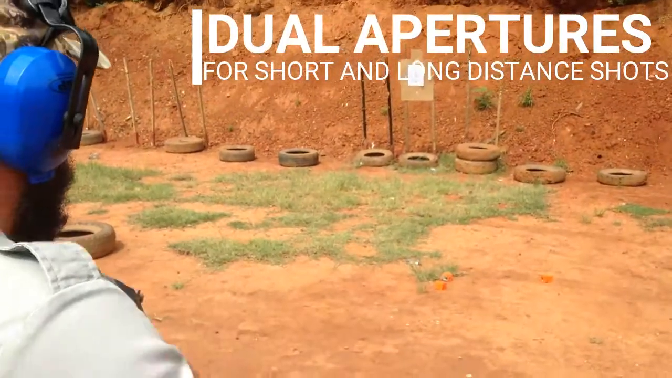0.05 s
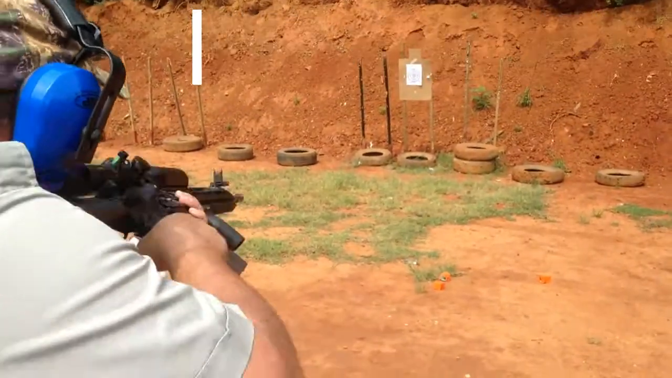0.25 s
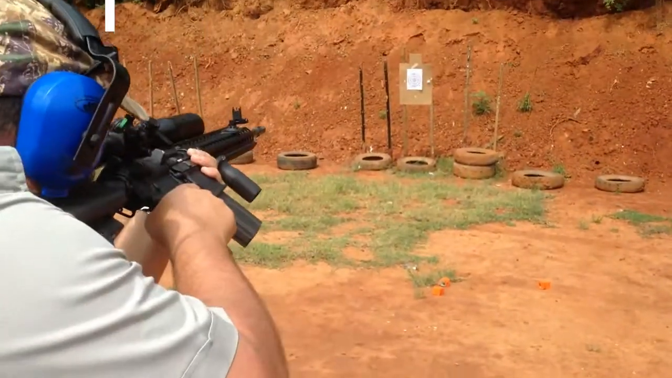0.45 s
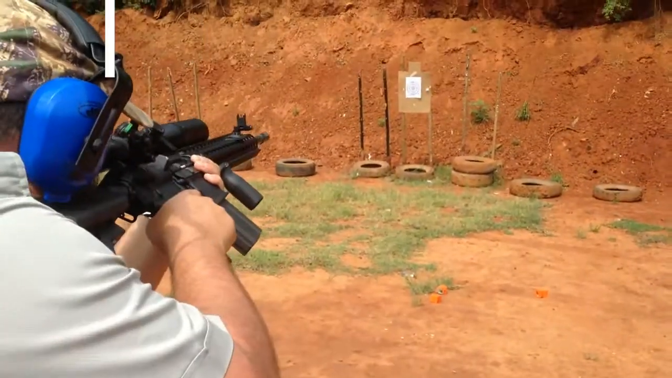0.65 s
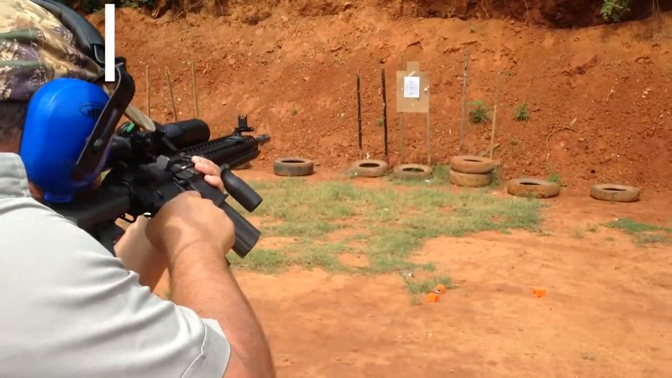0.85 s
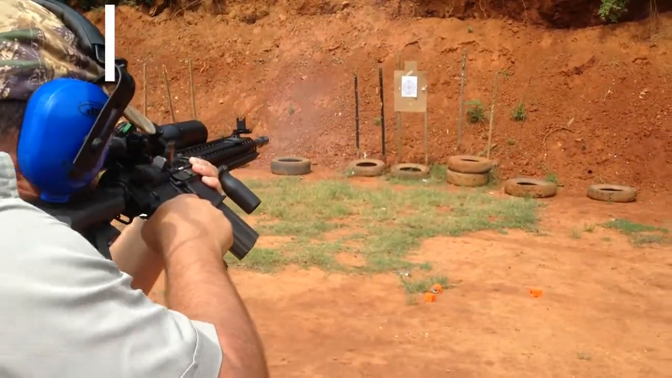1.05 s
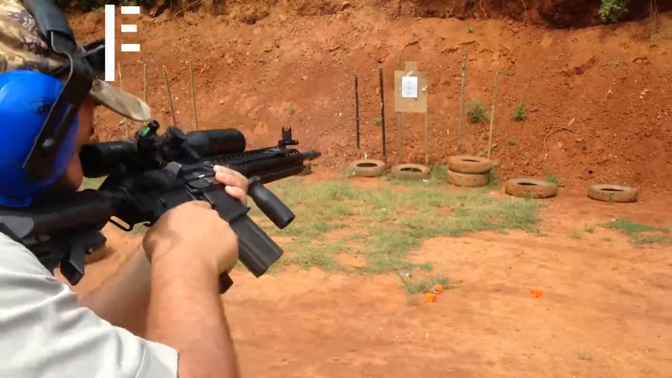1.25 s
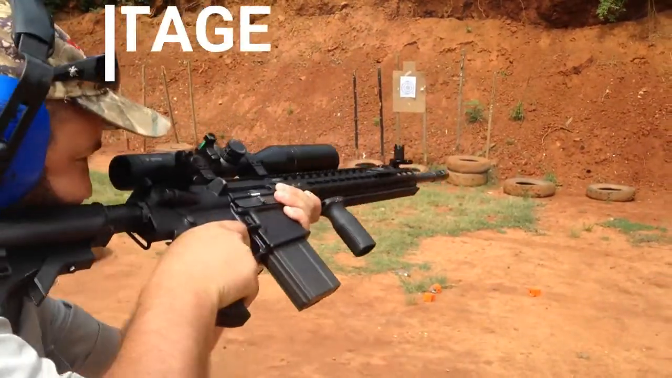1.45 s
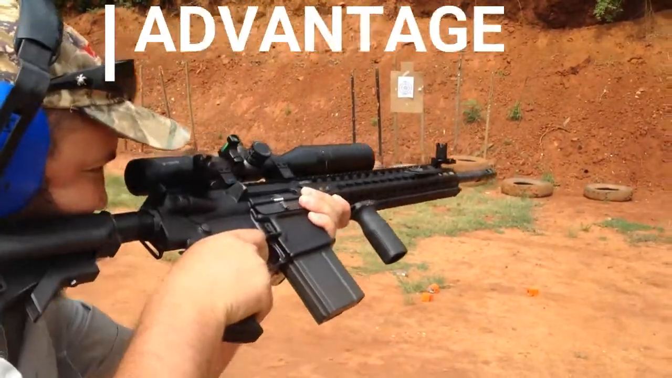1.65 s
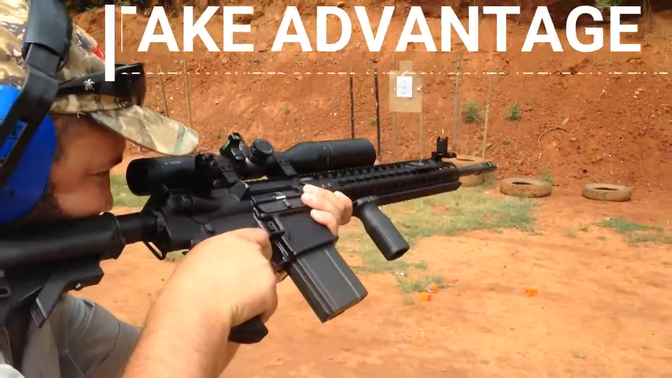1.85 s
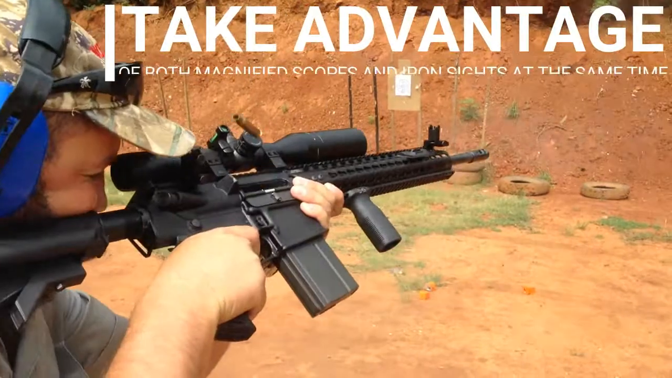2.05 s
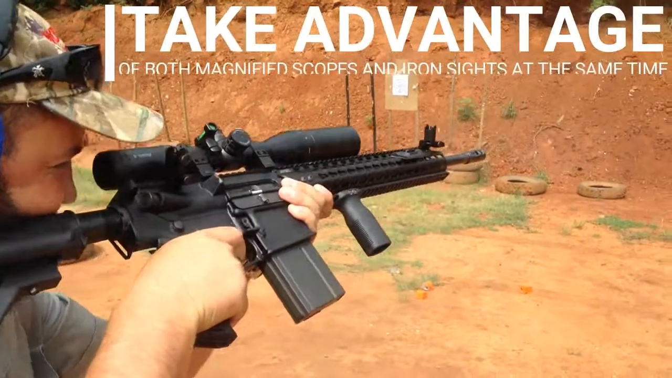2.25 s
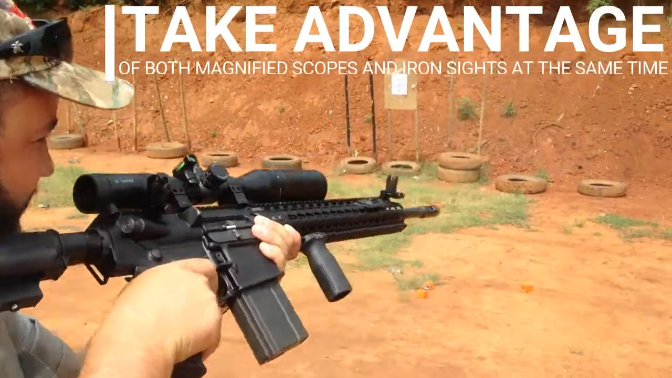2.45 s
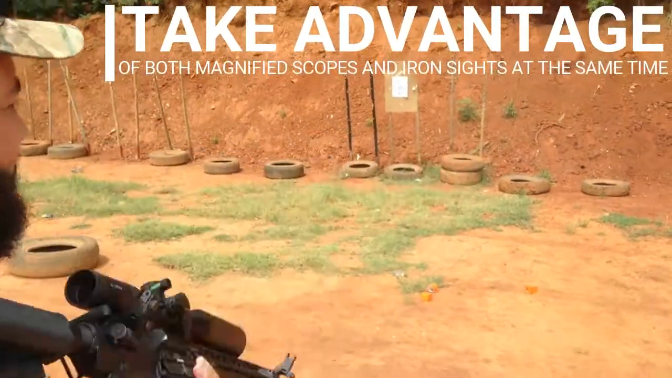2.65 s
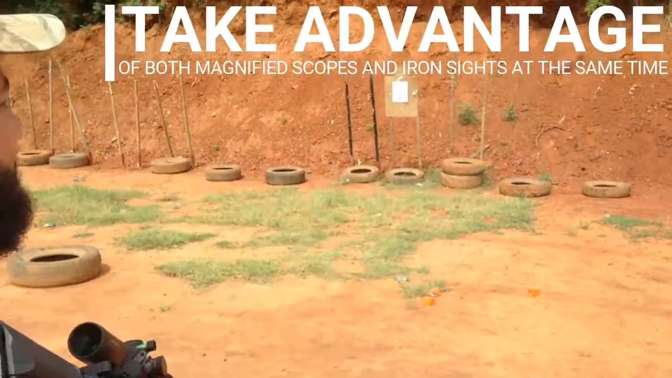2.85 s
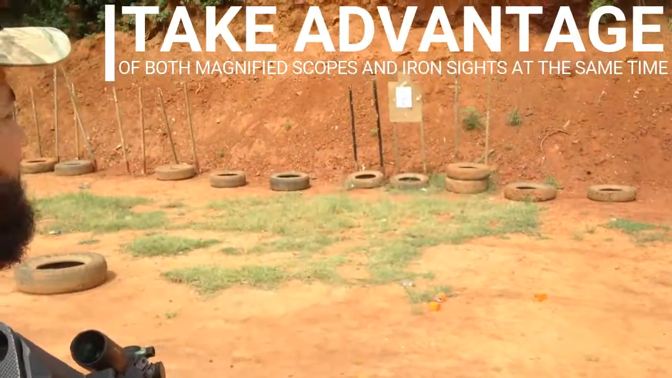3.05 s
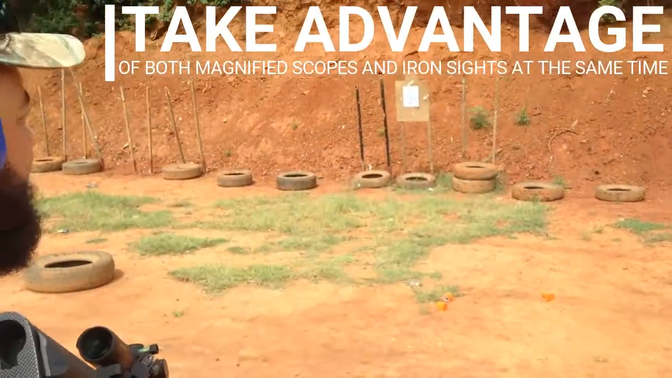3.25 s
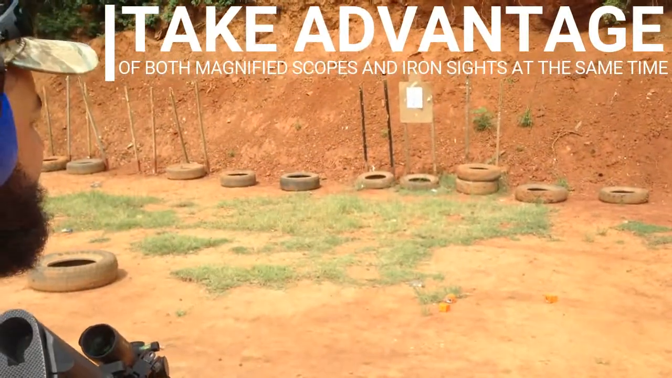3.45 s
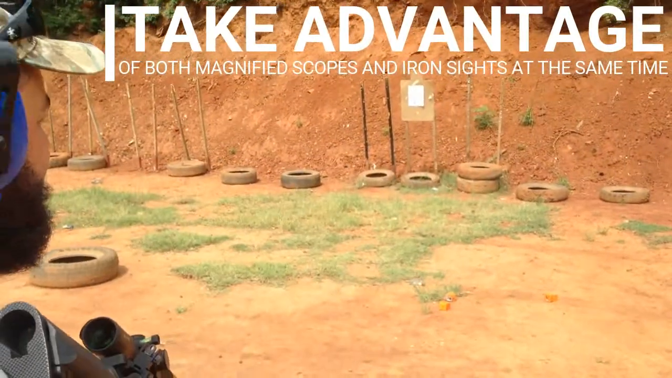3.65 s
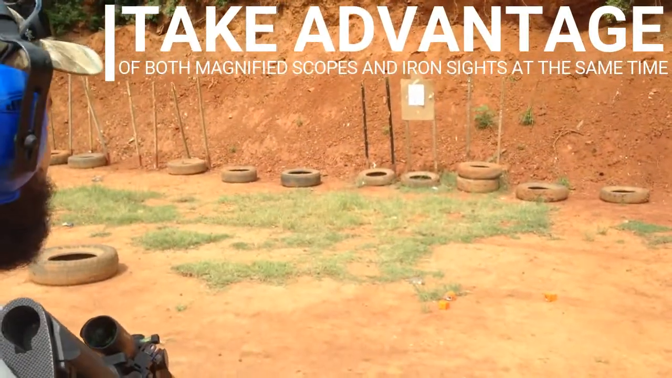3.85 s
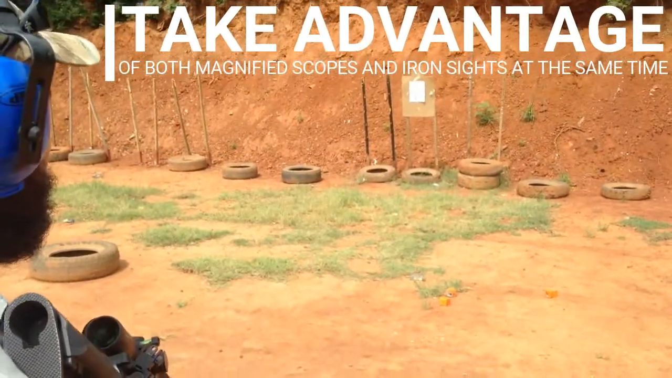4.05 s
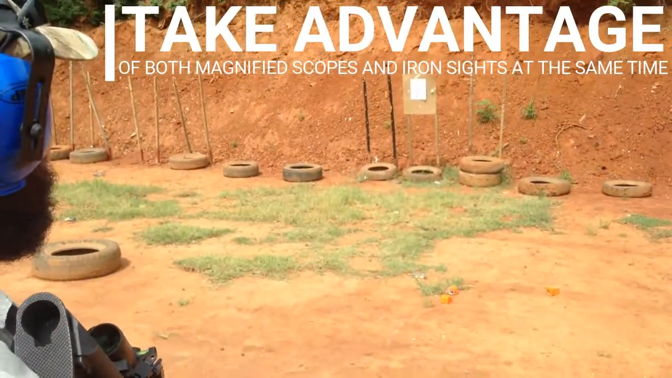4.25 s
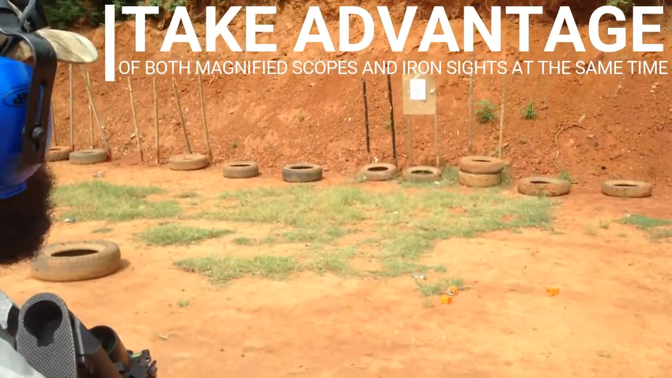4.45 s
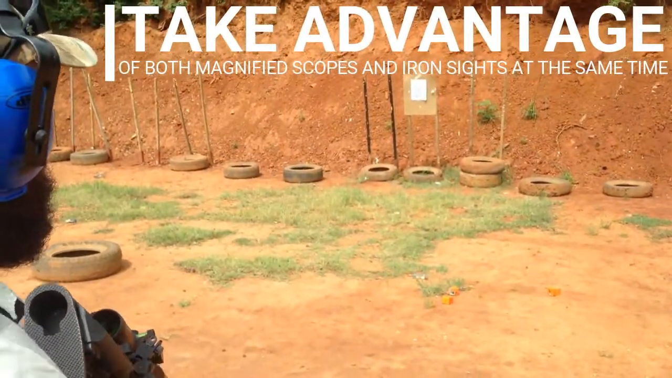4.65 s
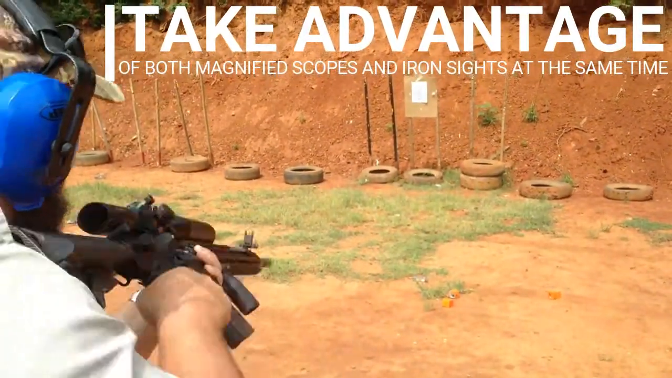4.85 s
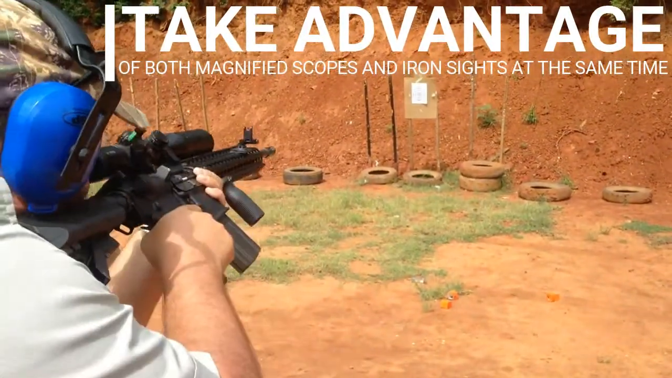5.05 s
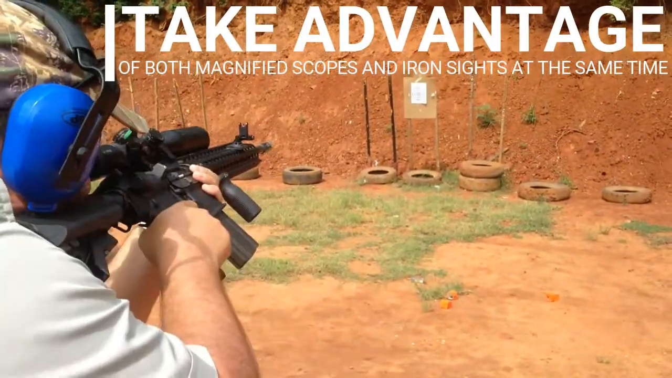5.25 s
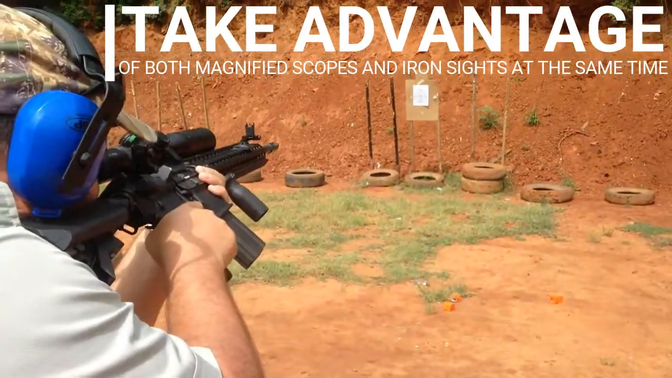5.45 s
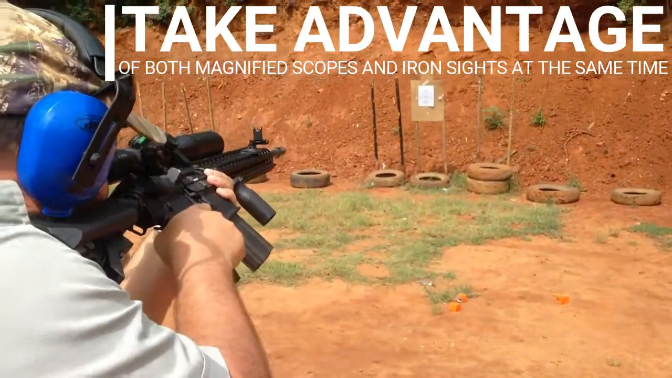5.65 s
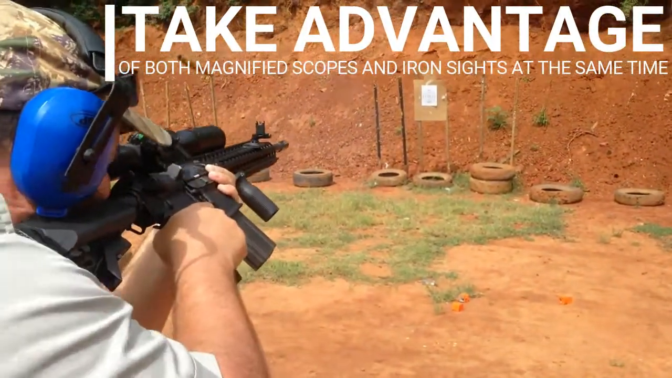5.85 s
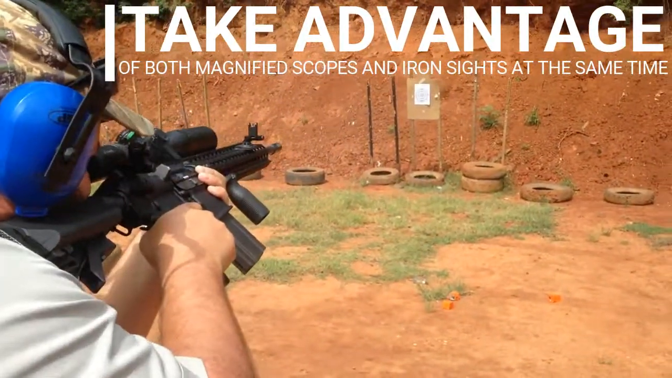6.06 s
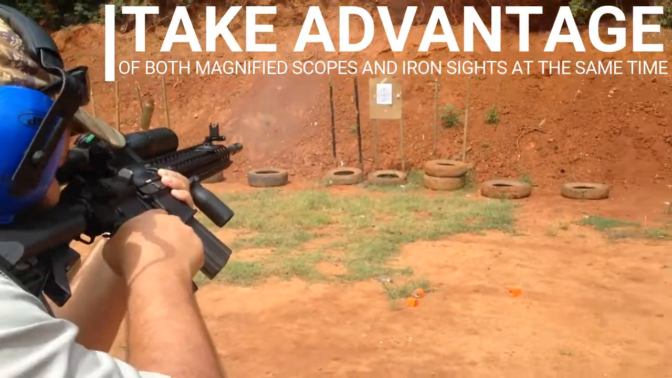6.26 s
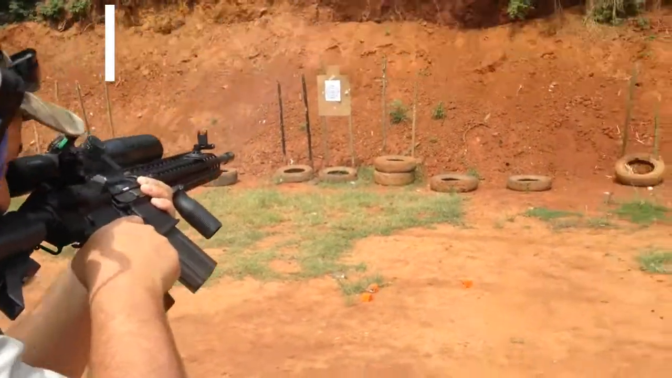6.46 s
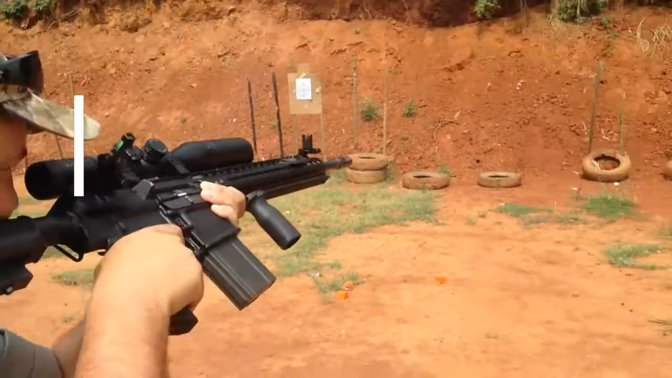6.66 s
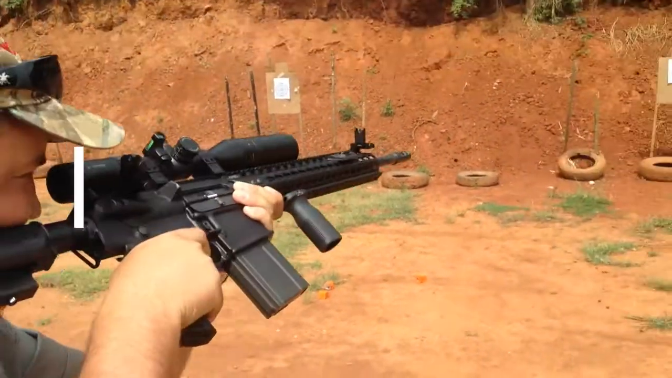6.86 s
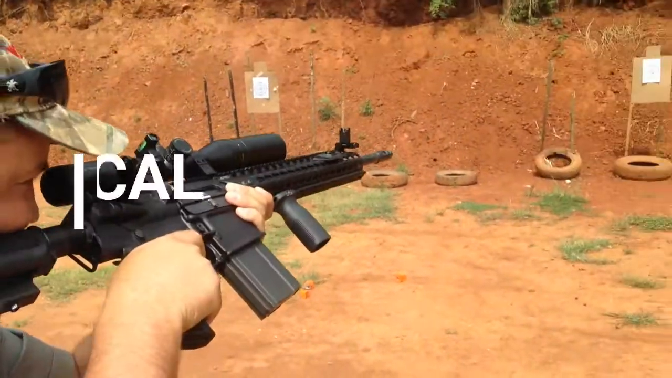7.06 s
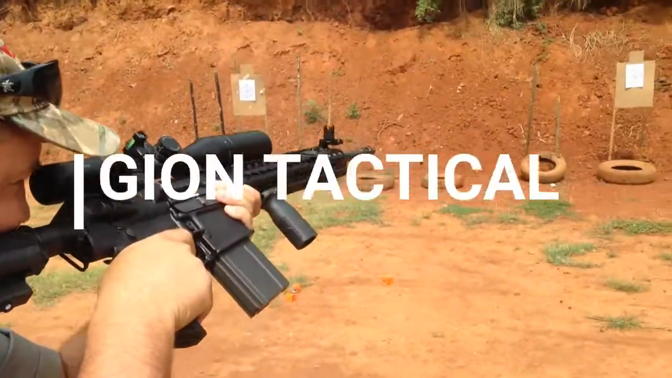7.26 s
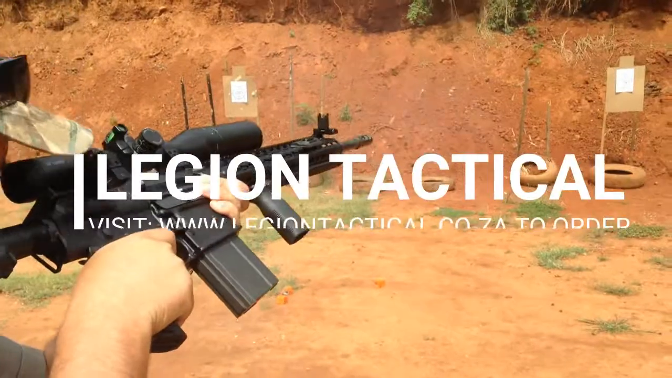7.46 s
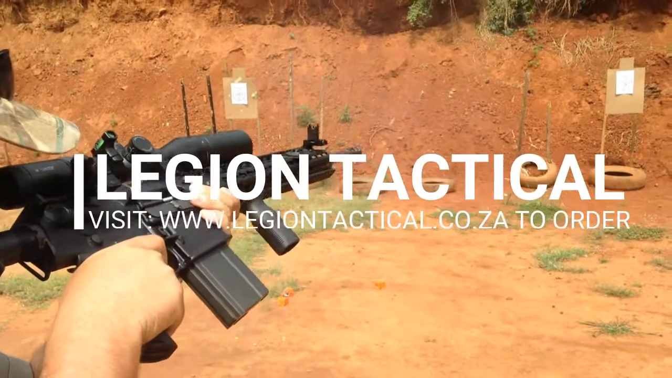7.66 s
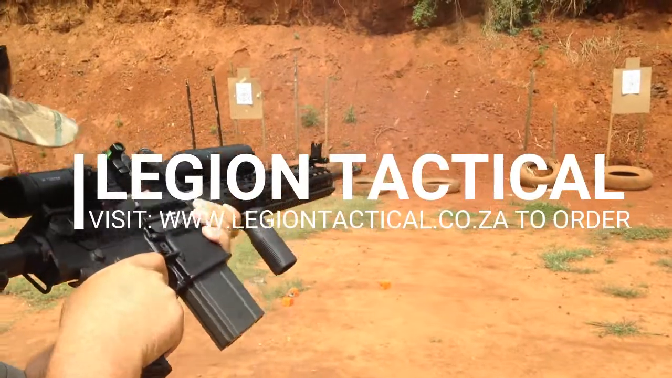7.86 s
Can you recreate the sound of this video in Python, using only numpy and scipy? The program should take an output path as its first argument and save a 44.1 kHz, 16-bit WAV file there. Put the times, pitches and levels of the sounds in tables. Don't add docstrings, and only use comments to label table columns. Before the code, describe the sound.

Phone microphone a step from a rifle in an earth-walled outdoor bay. Two sharp, limited blasts come about a second apart, with dense immediate reflections and a duller late echo. A long gap follows with roaring trees, low wind thumps, strap rustle, metal clicks, high brass rings and gritty crackle. Two more shots come close together, then a final one cuts in near the end.

```python
import sys
import numpy as np
from scipy import signal
from scipy.fft import rfft, irfft
from scipy.io import wavfile
from scipy.ndimage import uniform_filter1d, minimum_filter1d

SR = 44100
rng = np.random.default_rng(int(sys.argv[2]) if len(sys.argv) > 2 else 0)


def pcm_store(signal):
    levels = np.round(np.clip(np.atleast_2d(signal), -1, 1) * 32767)
    wavfile.write(sys.argv[1], SR, levels.astype(np.int16).T)


def level_to_linear(level):
    exponent = np.asarray(level, float) / 20
    return 10 ** exponent


N = 348654
TIME = np.arange(N) / SR


def unit(x):
    return x / np.sqrt(np.mean(x ** 2))


def colour(x, table):
    hz, db = np.transpose(table)
    f = np.fft.rfftfreq(len(x), 1 / SR) + 1
    gain_db = np.interp(np.log(f), np.log(hz), db, left=-60, right=-60)
    return unit(irfft(rfft(x) * level_to_linear(gain_db), len(x)))


def band(x, hz, octaves):
    f = np.fft.rfftfreq(len(x), 1 / SR) + 1
    return irfft(rfft(x) * np.exp(-(np.log2(f / hz) / octaves) ** 2), len(x))


def add(out, s, x):
    i = int(s * SR)
    out[i:i + len(x)] += x[:len(out) - i]


def pulse(ms, rebound):
    t = (np.arange(SR // 50) / SR * 1000 - 5) / ms
    return np.exp(-3 * t ** 2) - rebound * np.exp(-((t - 4) / 3) ** 2)


def wavelet(hz, cycles, phase):
    turns = np.arange(-2048, 2048) / SR * hz
    return np.exp(-4.5 * (turns / cycles) ** 2) * np.sin(2 * np.pi * (turns + phase))


def walk(rate_hz, size=N):
    k = int(SR / rate_hz)
    held = np.repeat(rng.standard_normal(size // k + 1), k)
    return unit(uniform_filter1d(uniform_filter1d(held, k), k)[:size])


def scatter(size, spread_db):
    return unit(rng.standard_normal(size) * level_to_linear(spread_db * rng.exponential(size=size)))


def contacts(rows, octaves, ms):
    out, t_ms = np.zeros(N), np.arange(4096) / SR * 1000
    for s, db, hz, *wide in rows:
        noise = rng.standard_normal(len(t_ms))
        noise[int(ms * SR / 1000)] += 12
        burst = band(noise, hz, octaves * np.prod(wide)) * (t_ms / ms) * np.exp(-t_ms / ms)
        add(out, s, level_to_linear(db) * burst / np.abs(burst).max())
    return out


# time in seconds, far trees in dB, the shooter's movement in dB (cloth
WIND = [(0, -66.5, -66.5), (.32, -66, -66.5), (.601, -73, -72.5), (1.04, -81, -72), (1.88, -50, -60),
        (2.03, -58.5, -59), (2.74, -44.5, -61), (2.95, -46, -58.5), (3.74, -45, -60), (4.0, -47.5, -65.5),
        (4.35, -46, -67), (4.51, -49.5, -68.5), (4.63, -57.5, -68), (5.0, -61, -67), (5.4, -65, -70.5),
        (6.95, -51, -70), (7.33, -48, -60.5)]
# frequency in Hz, density in dB per Hz.
TREE_ROAR = [(150, -27), (250, -7.5), (400, -2.5), (600, 2), (780, -2), (950, -6), (1400, -7.5),
             (2150, -10), (2700, -22), (3900, -44)]
CLOTH_HISS = [(2000, -32.5), (3000, -3), (5000, -6), (7000, -7.5), (9500, -12.5), (13000, -20), (15500, -20)]
STILL_AIR = [(100, -9), (300, -3), (1000, -3.5), (1600, -6.5), (2150, -3), (2700, -12), (4000, -19.5)]


def wind():
    s, *columns = np.transpose(WIND)
    roar_db, hiss_db = (np.interp(TIME, s, c) for c in columns)
    roar = colour(rng.standard_normal(N), TREE_ROAR)
    flicker = sum(level_to_linear(2.4 * walk(45)) * band(roar, hz, 0.63) for hz in (200, 400, 800, 1600, 3200))
    out = level_to_linear(roar_db - 1.5) * np.clip((roar_db + 71.0) / 12, 0, 1) * flicker
    out += level_to_linear(-66 + 0.37 * (hiss_db + 73.5)) * colour(rng.standard_normal(N), STILL_AIR)
    return out + level_to_linear(hiss_db - 1.0 + 1.0 * walk(2.9)) * colour(scatter(N, 1.2), CLOTH_HISS)


# time in seconds, rumble in dB.
GUSTS = [(0, -71), (.26, -79), (.32, -62), (1.05, -67), (1.9, -79), (2.72, -70), (2.79, -49), (3.3, -48),
         (3.9, -52), (4.0, -64), (4.35, -52), (4.48, -68), (4.63, -50.5), (5.35, -49.5), (5.58, -70),
         (5.68, -53.5), (5.8, -57), (7.4, -62.5)]
# time in seconds, peak in
# dB, frequency in Hz.
EDDIES = [(2.7792, -17.5, 180), (2.794, -17, 137), (2.953, -20, 177), (2.979, -26.5, 118),
          (2.994, -25.5, 93.5), (3.2135, -18, 120), (3.43, -35.5, 190), (1.082, -36.5, 90),
          (3.6195, -33.5, 160), (3.6883, -33, 119), (3.802, -25, 140), (3.8256, -24.5, 181),
          (3.8395, -17.5, 209), (3.854, -29, 157), (2.769, -25.5, 300), (5.285, -37, 104), (4.1, -24, 145),
          (4.1203, -24.5, 107), (4.204, -26.5, 126), (4.2347, -20.5, 173), (4.3228, -26, 163),
          (5.3218, -40.5, 211), (4.7086, -35.5, 113), (4.722, -36, 188), (4.914, -30.5, 137),
          (4.9658, -30, 102), (5.0833, -38, 154), (5.3473, -36, 87), (5.403, -36.5, 122),
          (5.6989, -38.5, 90.3)]
# frequency in Hz, density in dB per Hz.
RUMBLE = [(20, -18), (35, -11.5), (60, 0), (90, -1.5), (130, -10), (200, -15), (300, -31), (500, -51)]


def port():
    wake_db, wake_s = -26.5, 0.058
    small_db, small_hz = 7, 109
    out = np.zeros(N)
    power = level_to_linear(np.interp(TIME, *np.transpose(GUSTS))) ** 2
    for (s, db, hz), phase in zip(EDDIES, rng.random(len(EDDIES))):
        cycles = 0.73 - 0.06 * (db + 18.5)
        add(out, s - 2048 / SR, level_to_linear(db - 0.5) * wavelet(hz, cycles, phase))
        power = power + level_to_linear(db + wake_db) ** 2 / (1 + ((TIME - s) / wake_s) ** 2)
    rumble = np.sqrt(power)
    for when, size, pitch, phase in rng.random((170, 4)):
        s = .1 + when * (TIME[-1] - .2)
        eddy = wavelet(small_hz * 2 ** (1.2 * pitch - .6), 1.3, phase)
        add(out, s - 2048 / SR, rumble[int(s * SR)] * level_to_linear(small_db - 9 * size) * eddy)
    return out + rumble * level_to_linear(3.0 * walk(30)) * colour(rng.standard_normal(N), RUMBLE)


# start in seconds, peak in dB, frequency in Hz.
SCUFFS = [
    (.16, -47, 2400),
    (4.726, -42, 1670),
    (4.83, -49, 1490),
    (5.66, -54, 1284),
]
# start in seconds, peak in dB, frequency in Hz.
RUSTLES = [(3.088, -27.5, 620), (3.139, -32.5, 744), (3.418, -30, 505), (3.443, -32, 760),
           (3.644, -43, 614), (3.76, -34.5, 550), (3.978, -43, 646), (4.013, -38, 627), (4.054, -34, 680),
           (4.129, -35, 580)]


def cloth():
    return contacts(SCUFFS, octaves=0.63, ms=8.7) + contacts(RUSTLES, octaves=.4, ms=6.1)


# start in seconds, peak in dB, frequency in Hz, width as a factor.
CLACKS = [(.2700, -40, 1300, 1.0), (2.3270, -8, 2000, .9), (2.1965, 4, 7450, 0.41), (2.647, -17, 1900, 0.5),
          (3.4860, -38, 2400, .3), (3.5123, -26.5, 1780, .6), (4.025, -38, 2100, 0.28),
          (4.7722, -35, 2100, .95), (4.8790, -45, 2500, 0.26), (7.3749, -11.5, 1700, 0.79)]


def plastic():
    return contacts(CLACKS, octaves=0.91, ms=0.9)


# start in seconds, length in seconds, start in Hz, end in Hz, arch in Hz, level in dB.
WHISTLES = [
    (.45, .04, 5300, 5500, -3, -74),
    (0.765, 0.094, 3780, 3780, 166, -69),
    (4.524, 0.073, 5350, 4870, -60, -74),
    (4.6, 0.086, 4870, 4650, 60, -72),
    (4.9, 0.055, 4460, 3900, 0, -73.5),
    (4.96, 0.058, 3570, 3000, 0, -67),
    (5.18, 0.095, 4600, 3060, -250, -69),
]


def birds():
    out = np.zeros(N)
    for s, length_s, start_hz, end_hz, arch_hz, db in WHISTLES:
        x = np.linspace(0, 1, int(length_s * SR))
        hz = start_hz + (end_hz - start_hz) * x + arch_hz * np.sin(np.pi * x)
        level = level_to_linear(db + 1.5 + 1.6 * walk(70, size=SR)[:len(x)]) * np.sin(np.pi * x) ** 0.25
        add(out, s, level * np.sin(2 * np.pi * np.cumsum(hz) / SR))
    return out


# delay in seconds, level in dB.
ECHOES = [(.006, -10.5), (.027, -17), (.11, -8.5), (.17, -16.5), (.26, -33.5), (.35, -37.5), (.49, -32.5),
          (.58, -38), (.94, -61.5)]
# frequency in Hz, density in dB per Hz.
BLAST = [(15, -57), (25, -34.5), (60, -17.5), (200, -10.5), (290, -8), (400, -7), (520, -4), (650, -5),
         (850, -6.5), (1400, -8.5), (2150, -6.5), (2850, -14), (6550, -18.5), (10500, -29.5), (15500, -40)]
CRACK = [(120, -43.5), (200, -18), (769, -1.5), (1510, -7), (2090, 0.5), (3300, -9), (4580, -9.5),
         (15500, -18.5)]


def blast(same, new, crack, lumps_db):
    t = np.arange(len(new)) / SR
    level_db = np.interp(t, *np.transpose(ECHOES + [(1.45, -75)]))
    bass_db = -1 + 9 * (1 - np.exp(-t / 0.22)) - 3.5 * np.exp(-((t - .31) / 0.027) ** 2)
    treble_db = 3.5 - 7.5 * (1 - np.exp(-t / .2)) - 10.5 * np.exp(-((t - .45) / 0.092) ** 2)
    echo = 0
    for k, hz in enumerate(30 * 2 ** np.arange(0, 9.1, .5)):
        share = np.clip(1.1 - hz / 3000, 0, .9)
        place = np.log2(hz / 800)
        tilt_db = bass_db * min(-place / 1.9, 1.2) if place < 0 else treble_db * (place / 3.1) ** 3.0
        tilt_db = tilt_db - 6.5 * max(np.log2(120 / hz), 0) * np.minimum(t / .3, 1)
        mixed = np.sqrt(share) * same + np.sqrt(1 - share) * new
        echo = echo + level_to_linear(tilt_db + lumps_db[k // 3]) * band(mixed, hz, 0.4)
    echo = echo * level_to_linear(level_db + 1.0)
    echo += level_to_linear(-2.0) * colour(crack, CRACK) / (1 + np.exp(np.clip((t - .018) / 0.002, -50, 50)))
    return echo * (1 - np.exp(-t / 0.00043))


# frequency in Hz, density in dB per Hz.
LEAD_SWELL = [(100, -11.5), (300, -1), (550, 4.5), (1200, -15.5), (2800, -4.5), (4500, -27), (15000, -35.5)]


def lead_swell(crack, lead_s, lead_db):
    before_s = np.arange(1000, 0, -1) / SR
    swell = level_to_linear(-16.5) + 1 / (1 + np.exp((before_s - lead_s) / 0.0017))
    body = colour(rng.standard_normal(len(crack)), LEAD_SWELL)[:1000]
    sizzle = unit(band(crack, 7000, 1.7))[:1000]
    return level_to_linear(lead_db) * body * swell + level_to_linear(lead_db - 22) * sizzle


# start in seconds, level in dB, stance 0-1, lead-in in seconds, lead-in in dB.
SHOTS = [
    (1.1110, -0.5, 0.09, 0.012, -24),
    (2.0791, -0.5, 1, 0.012, -25.5),
    (5.8535, -1, 0.1, 0.014, -23.5),
    (6.2936, -1, 0.08, 0.016, -34),
    (7.4057, -0.5, 1, 0.0082, -17.5),
]
# delay in seconds, level in dB.
BANKS = [(.0285, -2), (.0355, -6), (.0485, -4), (.0545, -4), (.067, -5), (.080, -4), (.092, -3), (.095, -5)]
# delay in seconds, level in dB, frequency in Hz, length in cycles.
RINGS = [(.054, -4.5, 620, 3.), (.079, -2, 530, 6.), (.095, -7.5, 560, 3.), (.114, -3.5, 519, 6.),
         (.128, -13.5, 605, 3.), (.147, -12, 559, 5.4), (.10, -12, 280, 3.), (0.141, -15, 287.2, 3.),
         (.515, -28, 400, 5.4)]


def shots():
    out, size = np.zeros(N), 65536
    t = np.arange(size) / SR
    stances = [scatter(size, 1.8) for _ in range(2)]
    phases = rng.random(len(RINGS))
    lumps_db = [1.6 * walk(30, size=size) * np.minimum(t / 0.28, 1) for _ in range(7)]
    for start, db, stance, lead_s, lead_db in SHOTS:
        same = colour(stances[int(round(stance))], BLAST)
        new = colour(scatter(size, 0.98), BLAST)
        crack = scatter(size, 1.4)
        add(out, start - 1000 / SR, lead_swell(crack, lead_s, lead_db))
        add(out, start, level_to_linear(db) * blast(same, new, crack, lumps_db))
        for delay, bank_db in BANKS:
            add(out, start + delay + .003 * stance - .005, -level_to_linear(db + bank_db) * pulse(0.39, .2))
        for (delay, ring_db, hz, cycles), phase in zip(RINGS, phases):
            thud = wavelet(hz, cycles, phase)
            add(out, start + delay + .002 * stance - 2048 / SR, level_to_linear(db + ring_db) * thud)
    return out


# start in seconds, peak in dB.
CLICKS = [(2.3292, -10), (2.6475, -24), (2.6637, -20), (2.6666, -17), (2.8155, -40), (2.8719, -48),
          (3.0294, -42), (3.1258, -41), (3.1628, -36), (3.445, -35), (3.512, -22.5), (3.639, -31),
          (3.817, -36), (3.8362, -42), (3.8467, -39), (4.179, -40), (4.5995, -47), (5.849, -29), (7.4, -9)]
# start in seconds, peak in dB.
TICKS = [(2.3267, -21), (2.796, -44), (3.5095, -35), (4.2063, -53), (6.82, -33), (6.9741, -52),
         (7.1302, -49.5), (7.1694, -56)]


def metal():
    clicks = contacts([(*row, 5370) for row in CLICKS], octaves=.6, ms=.85)
    return clicks + contacts([(*row, 12000) for row in TICKS], octaves=.45, ms=.9)


# frequency in Hz, level in dB, t60 in seconds.
CASES = [
    [(9787, 0, 0.15), (9620, -13, 0.31), (12540, -7, 0.4), (14315, -3, 0.31)],
    [(10270, -1, 0.17), (10140, -14, .2), (13080, -17, .3), (14760, 2, 0.17)],
    [(9300, -2, 0.22), (9313, -7, 0.21), (12140, -1.5, 0.36), (14250, -1, .45)],
]
# start in seconds, low pair in dB, upper rings in dB.
BOUNCES = [
    [(2.5727, -42, -47), (2.586, -31, -36), (2.62, -30, -52), (3.183, -58, -63)],
    [(3.513, -45, -39)],
    [(6.8206, -75, -60), (6.9747, -53, -68), (7.2351, -60, -63), (7.374, -41, -55)],
]


def brass():
    out, t = np.zeros(N), np.arange(SR // 2) / SR
    for modes, bounces in zip(CASES, BOUNCES):
        for s, low_db, upper_db in bounces:
            for (hz, mode_db, t60), db in zip(modes, (low_db, low_db, upper_db, upper_db)):
                flutter_db = 3 * walk(70.6, size=len(t))
                level = level_to_linear(db + mode_db - 60 * t / t60 + flutter_db) * (1 - np.exp(-t / 0.0023))
                add(out, s, level * np.sin(2 * np.pi * hz * t))
    return out


# start in seconds, peak in dB, pulse in ms, rebound as a ratio, sign.
KNOCK = [
    (2.646, 0, .38, .25, -1),
    (2.6508, -7, .5, .15, 1),
]


def knock():
    out = np.zeros(N)
    highpass = signal.butter(1, 90, "high", fs=SR, output="sos")
    for s, db, ms, rebound, sign in KNOCK:
        add(out, s - .005, sign * level_to_linear(db) * signal.sosfilt(highpass, pulse(ms, rebound)))
    return out


def grit():
    shifting = (TIME > 2.75) & (TIME < 4.95)
    grains = (rng.random(N) < 120 / SR) * shifting * rng.standard_normal(N)
    return level_to_linear(-46) * band(grains, 6500, .7)


def insect():
    throb = np.maximum(np.cos(2 * np.pi * 14.3 * (TIME - 5.39)), 0) ** 1.5 * (TIME > 5.3) * (TIME < 5.78)
    return level_to_linear(-71.5) * throb * unit(band(rng.standard_normal(N), 4540, 0.25))


def scene():
    mix = wind() + port() + cloth() + plastic() + birds() + shots()
    mix += metal() + brass() + knock() + grit() + insect()
    return mix[None]


def top_cut(x):
    return signal.sosfilt(signal.butter(12, 16450, fs=SR, output="sos"), x)


# frequency in Hz, gain in dB.
TREBLE_TOP = [(10, 0), (15250, 0), (15500, -26), (16400, -33), (16500, -60)]


def record(dry):
    gain = np.minimum(1, .96 / (np.abs(dry) + 1e-9))
    gain = uniform_filter1d(minimum_filter1d(gain, size=257), size=257)
    hz, db = np.transpose(TREBLE_TOP)
    top = level_to_linear(np.interp(np.fft.rfftfreq(N, 1 / SR), hz, db))
    return top_cut(irfft(rfft(dry * gain) * top, N))


dry = scene()
out = record(dry)
pcm_store(out)
```